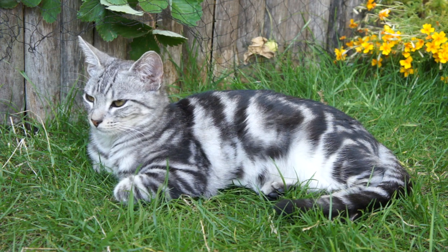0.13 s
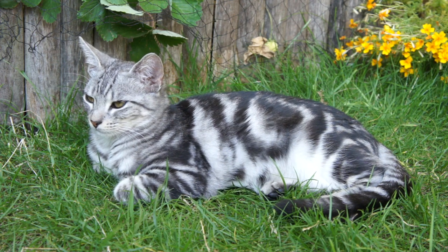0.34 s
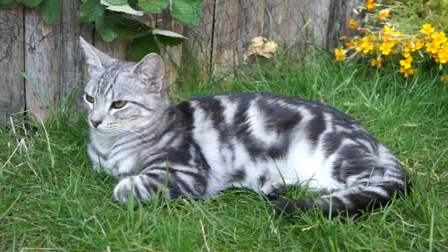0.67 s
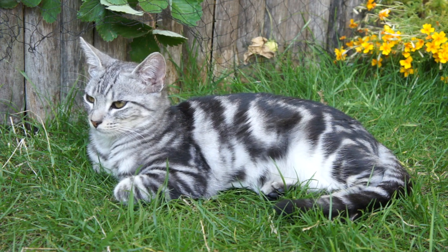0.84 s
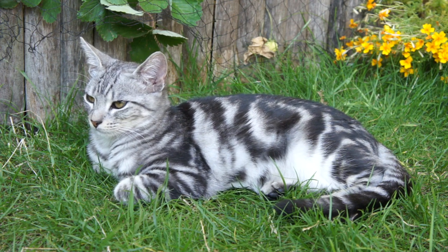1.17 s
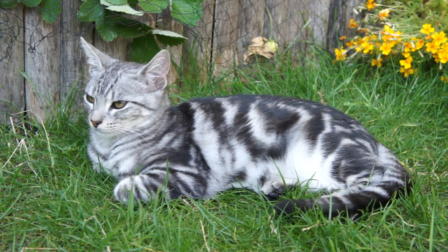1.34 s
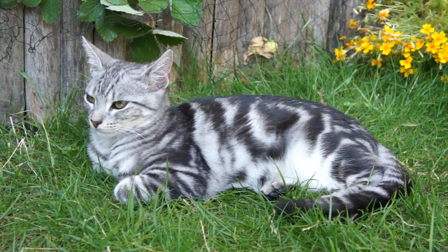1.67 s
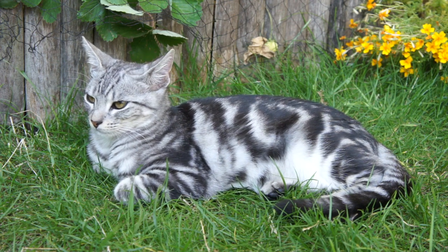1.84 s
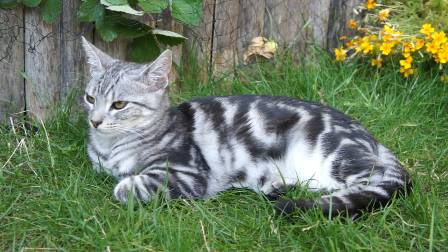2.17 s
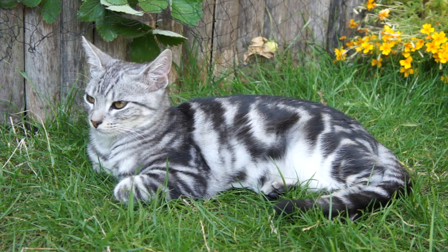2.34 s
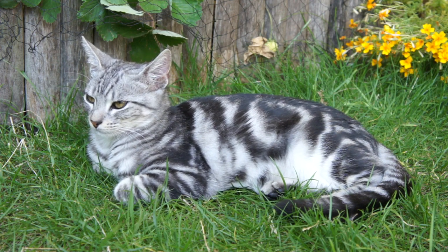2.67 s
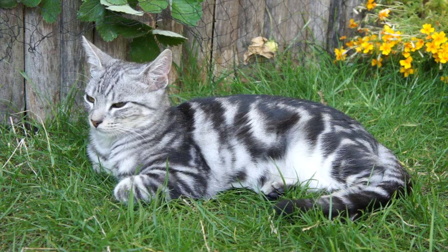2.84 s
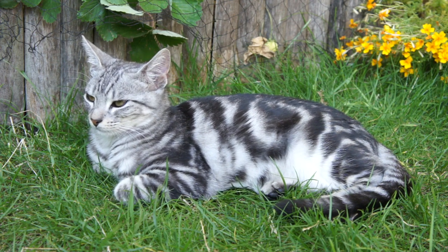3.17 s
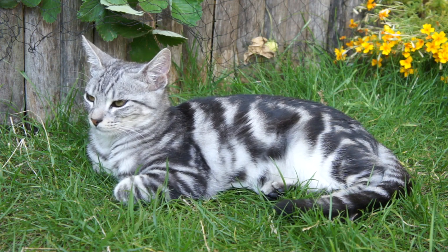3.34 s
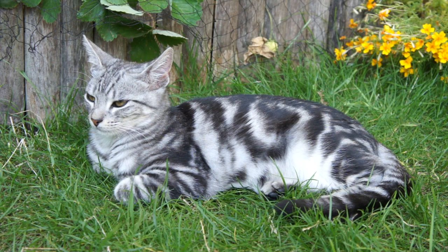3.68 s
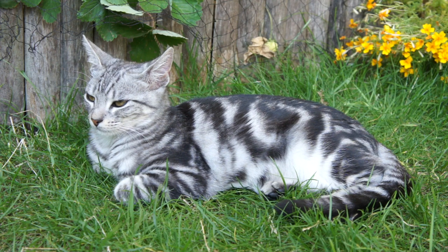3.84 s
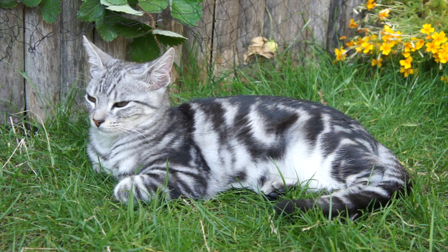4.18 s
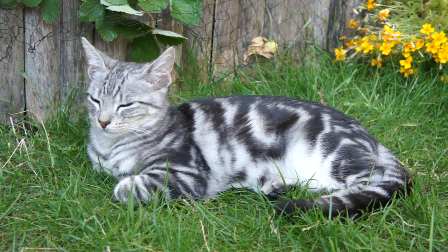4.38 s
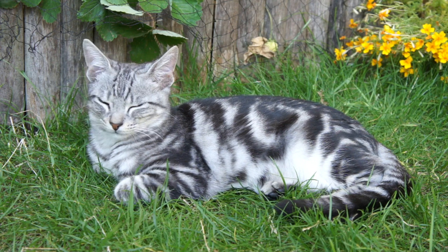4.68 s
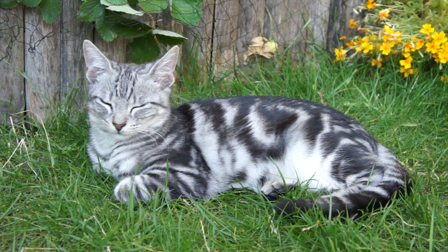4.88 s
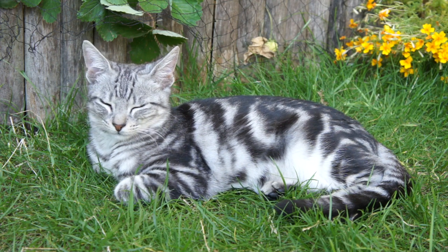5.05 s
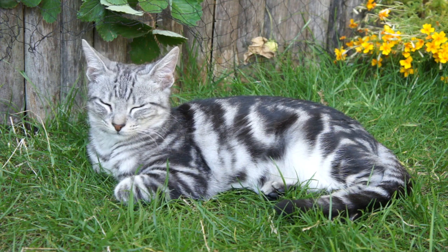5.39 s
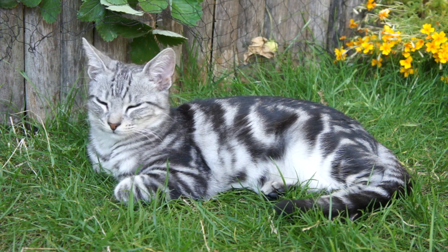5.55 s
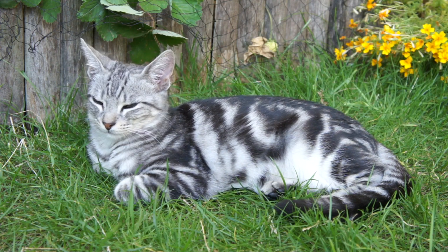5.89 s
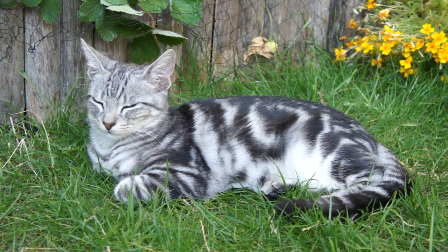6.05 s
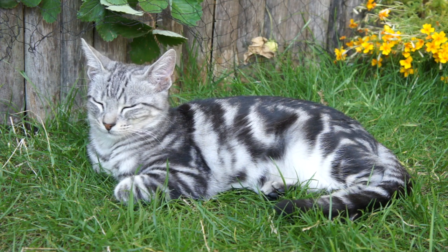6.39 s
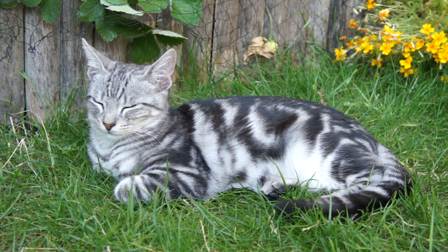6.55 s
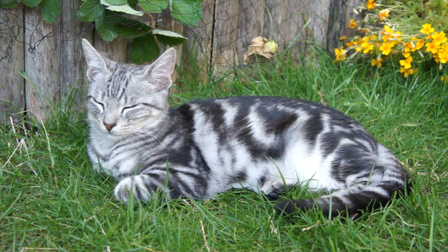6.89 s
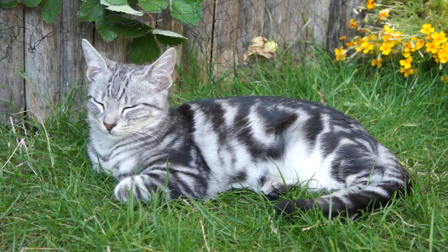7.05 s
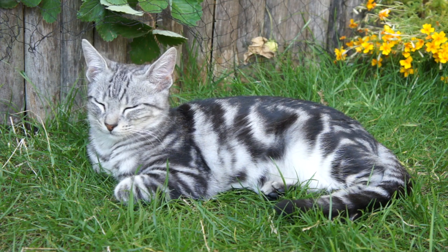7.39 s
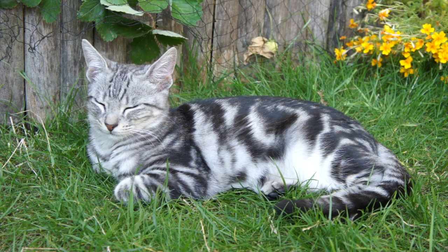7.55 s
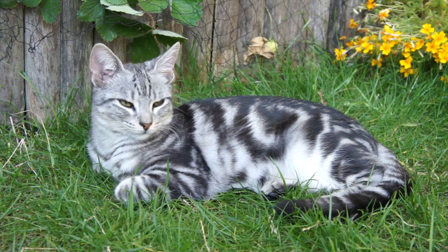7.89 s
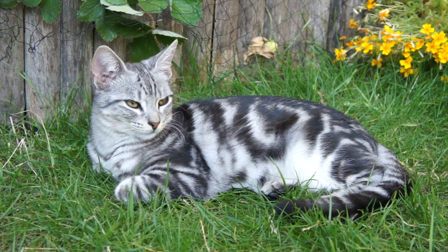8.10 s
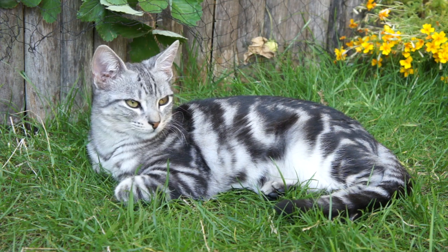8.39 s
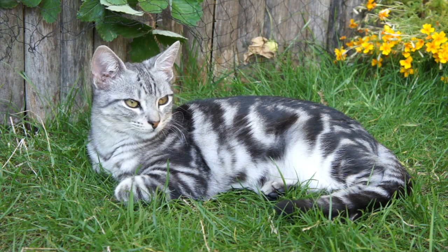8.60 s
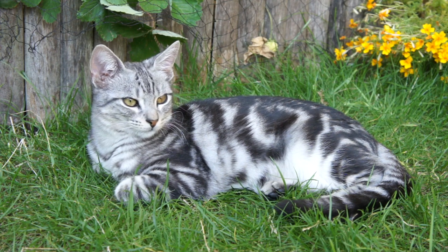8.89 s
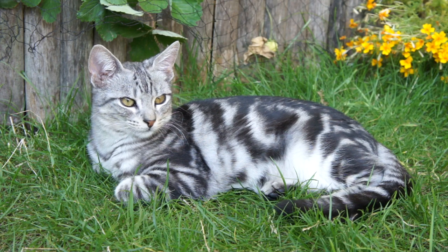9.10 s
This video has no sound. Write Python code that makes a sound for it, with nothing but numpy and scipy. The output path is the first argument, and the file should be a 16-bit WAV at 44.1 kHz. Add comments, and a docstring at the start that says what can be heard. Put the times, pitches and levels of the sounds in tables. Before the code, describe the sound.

Songbirds sing in a garden with a slight echo, over a very soft, distant rush of leaves and traffic. A nearby warbler opens with two high whistles, each followed by a tumbling note. From 1 to 2 seconds it repeats a quick sweeping, ticking phrase three times, then gives three rattling buzzes until about 3.2 seconds. Farther birds whistle and a flock chatters from roughly 2 to 4 seconds. The song thins to a lull around 5 seconds, where the rush dips and grass snaps faintly twice. At 6 seconds a second close bird gives a rising trill and a few falling notes, then a lower three-note phrase at about 7, 7.8 and 8.5 seconds, with distant whistles between. Soft, low gusts thump the microphone just after 7 seconds and again between 8 and 9. A faint row of pips closes the scene around 9 seconds.

```python
"""Songbirds in a garden, their gliding tones echoing off fences and trees over a soft distant rush.
A near warbler opens with whistles and tumbling notes, then rattles through sweeps, ticks and buzzes
while far birds whistle and a flock chatters. Midway the rush sinks and the grass snaps. A second near
bird trills and repeats a three-note phrase as gusts thump the microphone; faint pips close the scene."""
import sys
import numpy as np
from scipy import signal
from scipy.fft import rfft, irfft, next_fast_len
from scipy.io import wavfile
from scipy.ndimage import uniform_filter1d, map_coordinates

SR = 44100
rng = np.random.default_rng(int(sys.argv[2]) if len(sys.argv) > 2 else 0)


def pcm_store(signal):
    """Save signal as 16-bit PCM."""
    levels = np.round(np.clip(np.atleast_2d(signal), -1, 1) * 32767)
    wavfile.write(sys.argv[1], SR, levels.astype(np.int16).T)


N = 407043
TIME = np.arange(N) / SR


def amp(db):
    """Decibels to gain."""
    return 10 ** (np.asarray(db) / 20)


def unit(x):
    """Scale to rms 1."""
    return x / np.sqrt(np.mean(x ** 2) + 1e-20)


def along(points, hz):
    """Read a curve of (f/Hz, value) points on a log frequency axis."""
    f, value = np.transpose(points)
    return np.interp(np.log(hz + 1), np.log(f + 1), value)


def wobble(rate):
    """A smooth random modulator, rate knots a second."""
    return map_coordinates(rng.standard_normal(int(N * rate / SR) + 4), [TIME * rate])


def filtered(x, response):
    """EQ x with a gain curve over frequency."""
    size = next_fast_len(N + 8192)
    return irfft(rfft(x, size) * response(np.fft.rfftfreq(size, 1 / SR)), size)[..., :N]


def stereo_noise(spectrum, correlation):
    """Coloured mid/side noise of rms 1; low correlation makes it wide."""
    def response(hz):
        width = np.arccos(np.clip(along(correlation, hz), -1, 1)) / 2
        return amp(along(spectrum, hz)) * [np.cos(width), np.sin(width)]
    mid, side = filtered(rng.standard_normal((2, N)), response)
    return unit(np.array([mid + side, mid - side]))


# Colour of the bed: f/Hz, relative level/dB
RUSH_EQ = [(30, -46.5), (190, -16), (350, -9), (750, -12.5), (1100, -15), (3330, -17.5), (6770, -28.5),
           (8800, -39), (11300, -53), (12000, -75.5)]
# Its stereo image: f/Hz, left-right correlation
RUSH_IMAGE = [(100, 1), (300, 0.79), (3000, 1), (8000, 0.92)]
# Its fader rides: t/s, rustle level/dB, hiss level/dB
RUSH_FADERS = [(0, -67.5, -70.5), (3.701, -67, -67.5), (4.6, -70.5, -71.5), (5.069, -76.5, -79.5),
               (5.1, -64, -77.5), (5.219, -71, -75), (5.349, -64.5, -74.5), (5.7, -69.5, -75),
               (5.781, -62, -68.5), (9.23, -62.5, -68.5)]

def distant_rush():
    """A bed of leaves and traffic: an uneven low rustle and a high hiss that swell separately."""
    s, rustle_db, hiss_db = np.transpose(RUSH_FADERS)
    noise = stereo_noise(RUSH_EQ, RUSH_IMAGE)
    low = filtered(noise, lambda hz: 1 / (1 + (hz / 1200) ** 4))
    rustle = amp(np.interp(TIME, s, rustle_db) + 0.98 * wobble(14)) * low
    return rustle + amp(np.interp(TIME, s, hiss_db)) * (noise - low)


# Overtones passed by throat resonances: harmonic, relative level/dB, centre f/Hz, width/Hz, onset t/s
OVERTONES = [(2, -37, 7900, 900, .012), (4, -51, 10550, 430, .05)]

def sing(notes, edge_s, hoarse, rasp_hz, bright_db=np.zeros(N), smooth_samples=151):
    """A bird's throat: gliding sines through (t/s, f/Hz, level/dB) points, smeared by hoarse breath."""
    out = np.zeros(N)
    rasp = wobble(rasp_hz) + 1j * wobble(rasp_hz)
    uneven_db = 0.5 * wobble(70)
    overtone_blur = 1 + 1.1 * rasp
    roughness = np.sqrt(1 - hoarse) + np.sqrt(hoarse / 2) * rasp
    for note in notes:
        s, *columns = np.array(sorted(note)).T
        at = np.arange(max(int((s[0] - edge_s) * SR), 0), min(int((s[-1] + edge_s) * SR), N))
        t = at / SR
        hz, *curves = (np.interp(t, s, column) for column in columns)
        hz = uniform_filter1d(hz, smooth_samples, mode="nearest")  # muscles round a glide's corners
        if len(curves) == 1:
            db, = curves
        else:  # a throbbing note: slant makes each throb climb slowly, swelling, and drop back fast
            top_hz, db, depth_db, slant, rate = curves
            turn = 2 * np.pi * np.cumsum(rate) / SR
            lift = (1 + np.cos(turn + 0.78 * slant * (1 - np.cos(turn)))) / 2
            hz = hz + (top_hz - hz) * lift
            db = db + uneven_db[at] + depth_db * (np.cos(turn + 2 * np.pi * 0.32 * slant) - 0.5)
        fade = np.clip(np.minimum(t - s[0], s[-1] - t) / edge_s + 1, 0, 1) ** 2
        fundamental = np.exp(2j * np.pi * np.cumsum(hz) / SR)
        tone = fundamental.copy()
        for k, level, centre, width, onset in OVERTONES:
            resonance = amp(level + bright_db[at]) * np.exp(-((k * hz - centre) / width) ** 2)
            tone += overtone_blur[at] * resonance * fundamental ** k * (t > s[0] + onset - edge_s)
        out[at] += np.sqrt(2) * amp(db) * fade * np.real(tone * roughness[at])
    return out


# The near birds' syllable shapes, by name: t/s from the cue, f/Hz, relative level/dB
SYLLABLE_SHAPES = { "whistle": [(.003, 3670, -15), (.025, 3855, -11.5), (.031, 3900, -2), (.047, 4074, 1.5),
                   (.056, 3977, -3.5)], "step": [(0, 4210, -19), (.015, 3973, -1.5), (.03, 4030, -1.5),
                   (.05, 4600, 0), (.095, 4370, -5.5)], "sweep": [(0, 4620, -13), (.004, 5690, -7),
                   (.022, 6000, -6.5), (.042, 5540, -8.5), (.06, 5363, 1), (.08, 4750, -2), (.1, 4580, -8)],
                   "hook": [(0, 3746, -5), (.004, 4694, -4), (.03, 4560, -4)], "pipe": [(0, 3870, -2),
                   (.016, 4150, -1.5), (.046, 4250, -6.5)], "buzz": [(0, 4330, -5.5), (.015, 5790, -4),
                   (.028, 5325, 1), (.04, 5202, -8)], "fall": [(0, 5560, -4), (.019, 4440, 3.5),
                   (.044, 3530, 4), (.05, 3397, -18)], "climb": [(0, 3420, -13), (.06, 3910, 0),
                   (.095, 3970, 0.3)], "dip": [(0, 6500, -12), (.007, 4420, -1.5), (.017, 3755, -4.5),
                   (.035, 4190, -1), (.075, 4013, -0.5)], "stairs": [(0, 6560, -13), (.015, 5054, 1),
                   (.045, 4980, -1), (.06, 3800, -6), (.09, 3486, -15)], "warble": [(0, 4120, -27),
                   (.012, 4330, -5), (.035, 2650, -2.5), (.06, 3780, 0.5), (.08, 3080, 1),
                   (.105, 3484, -0.5), (.125, 2910, -8)], "leap": [(0, 1712, -27), (.012, 2512, -1),
                   (.028, 3035, 0.5), (.042, 3240, -16)], "drop": [(0, 3523, -8.5), (.015, 2684, 1.5),
                   (.035, 2403, -2), (.047, 2144, -10.5), (.053, 1620, -31)], "slide": [(0, 3166, -6),
                   (.015, 2504, 1.7), (.05, 2227, 1), (.11, 1952, -9), (.165, 1782, -8.5)],
                   "chip": [(0, 3725, -22), (.006, 2990, -4), (.015, 2554, -5.5), (.03, 2790, -1),
                   (.045, 2924, -3)], "chirp": [(-.003, 4700, -45.5), (.004, 3340, -6.5), (.014, 2625, -2),
                   (.026, 2598, -6), (.038, 2798, -0.5), (.049, 2882, -6)], "slur": [(.003, 2270, -5.5),
                   (.025, 2023, -6), (.042, 1918, -10.5), (.053, 2125, 0.5), (.063, 2540, 0.5),
                   (.075, 2678, 2.5), (.11, 2510, 2.1), (.17, 2465, -1.5), (.18, 2220, -11)], }
# Their cues, by name: t/s, pitch ratio, length ratio, level/dB
SYLLABLE_CUES = { "whistle": [(-.042, 0.96, 0.85, -29), (.435, 0.98, 0.86, -29)],
                 "step": [(.875, 1, 0.98, -32)], "sweep": [(1.057, 0.97, 0.86, -33), (1.425, 1, 1, -33.5),
                 (1.787, 1.006, 1.02, -34.5)], "hook": [(1.209, 1.07, 0.59, -41),
                 (1.577, 1.07, 0.74, -37.5), (1.932, 1.01, 1.2, -39)], "pipe": [(1.221, 1.008, 0.94, -36.5),
                 (1.589, 0.99, 0.9, -37), (1.944, 1.005, 1.01, -39)], "buzz": [(2.205, 0.99, 0.99, -39),
                 (2.64, 0.99, 0.84, -36), (3.085, 0.988, 0.89, -37)], "fall": [(2.297, 0.99, 0.95, -40.5),
                 (2.72, 1.037, 0.82, -41)], "climb": [(2.44, 1.01, 1.1, -47), (2.865, .99, 0.95, -46.5)],
                 "dip": [(4.035, 1, 1, -50.5)], "stairs": [(4.39, 1, 1, -48.5)],
                 "warble": [(5.725, 1, 0.99, -44)], "leap": [(6.42, 1.07, 1.02, -35.5),
                 (6.6, .93, 1.1, -34.5)], "drop": [(6.475, 0.99, 1, -33.5)],
                 "slide": [(6.65, 1, 0.99, -38)], "chip": [(7.048, 1.008, 1.016, -32),
                 (7.778, 0.99, .98, -33.5), (8.548, .995, 1, -33.5)], "chirp": [(7.142, 1, 1.1, -30.5),
                 (7.872, 0.97, 1.1, -33), (8.64, 1, 1.1, -31.5)], "slur": [(7.305, 1.004, 0.96, -36.5),
                 (8.03, 0.99, 1.02, -38), (8.805, 1, 1.0457, -39)], }

def syllables():
    """Each syllable keeps its shape, transposed and stretched for every cue."""
    return [[(s + stretch * after, ratio * hz, db + trim) for after, hz, trim in SYLLABLE_SHAPES[name]]
            for name, cues in SYLLABLE_CUES.items() for s, ratio, stretch, db in cues]


# Reverb time of the garden: f/Hz, t60/s
GARDEN_DECAY = [(1600, 0.45), (2400, 0.22), (4500, 0.18), (7000, 0.069)]

def garden_echo(send, predelay_s=0.0064, width=0.4, flutter_db=1.1):
    """Fences and foliage scatter the song; the pattern shifts and flutters as birds and leaves move."""
    out, hop = np.zeros((2, N + 2 * SR)), SR // 5
    send = np.pad(send, (hop, 0))
    for start in range(0, len(send), hop):  # a fresh tail for each overlapping grain
        hz, t, noise = signal.stft(rng.standard_normal((2, SR // 2)), SR, nperseg=256)
        age = t / along(GARDEN_DECAY, hz)[:, None]
        decay = amp(-60 * age ** 0.93) + amp(-25 - 22 * age)  # main tail and a faint late haze
        mid, side = signal.istft(noise * decay, SR, nperseg=256)[1]
        tail = np.array([mid + width * side, mid - width * side]) / np.linalg.norm(mid)
        grain = send[start:start + 2 * hop]
        grain = grain * np.hanning(2 * hop)[:len(grain)]
        echo = signal.fftconvolve(grain[None], tail, axes=1)
        first = start + int(predelay_s * SR)
        out[:, first:first + echo.shape[1]] += echo
    return out[:, hop:hop + N] * amp(flutter_db * wobble(120))


# A tumble: t/s from the cue, low f/Hz, high f/Hz, relative level/dB, throb depth/dB, slant 0-1
TUMBLE_SHAPE = [(0, 4780, 5633, -9.5, 13, 1), (0.035, 4708, 5150, 2, 5.5, 1),
                (0.05, 3650, 4310, -7, 0, 0.98), (0.071, 2810, 3080, -11.5, 3, 0.5)]
# Its cues: t/s, pitch ratio, level/dB, throb rate/Hz
TUMBLE_CUES = [(0.1276, 0.96, -32.5, 130), (0.567, 0.96, -33.5, 106)]

def tumbles():
    """The warbler's note throbs rapidly as it tumbles down in pitch."""
    return [[(s + after, ratio * low, ratio * high, db + trim, depth, slant, rate)
             for after, low, high, trim, depth, slant in TUMBLE_SHAPE]
            for s, ratio, db, rate in TUMBLE_CUES]


# Single ticks: centre t/s, level/dB
TICK_CUES = [(1.28, -38.5), (1.647, -40), (2.002, -47.5)]
# A four-tick rattle: t/s from the cue, start f/Hz, end f/Hz, relative level/dB
RATTLE_SHAPE = [(0, 6450, 4266, -2), (.015, 6740, 4990, -2.2), (.026, 6200, 5000, -3),
                (.039, 5910, 4504, 1.5)]
# Its cues: t/s, level/dB
RATTLE_CUES = [(2.152, -38), (2.587, -37), (3.031, -37.5)]

def ticks(fall_hz_per_s=260000):
    """Downward sweeps so steep that they click, loudest in the middle."""
    sweeps = [(s, 6510, 4730, db) for s, db in TICK_CUES]
    sweeps += [(s + after, top, end, db + trim)
               for s, db in RATTLE_CUES for after, top, end, trim in RATTLE_SHAPE]
    notes = []
    for s, top, end, db in sweeps:
        half_s = (top - end) / fall_hz_per_s / 2
        notes.append([(s - half_s, top, db - 13), (s, (top + end) / 2, db), (s + half_s, end, db - 5.5)])
    return notes


def glides(rows, swell_db_per_s, fade_db_per_s):
    """A glide swells to its peak, bends there and fades."""
    return [[(start, start_hz, db - swell_db_per_s * (peak - start)),
             (peak, peak_hz, db),
             (end, end_hz, db - fade_db_per_s * (end - peak))]
            for start, peak, end, start_hz, peak_hz, end_hz, db in rows]


# Background calls: start t/s, peak t/s, end t/s, start f/Hz, peak f/Hz, end f/Hz, level/dB
FAR_GLIDES = [ (1.59, 1.62, 1.628, 1540, 1700, 1760, -68.5), (1.77, 1.82, 1.826, 1560, 1750, 1785, -70.5),
              (1.885, 1.92, 1.95, 2600, 2960, 2964, -52.5), (1.95, 1.98, 2.02, 2970, 2950, 2760, -54),
              (2.02, 2.04, 2.09, 2874, 3090, 2850, -52), (1.92, 2.04, 2.14, 1920, 2170, 2136, -54),
              (2.91, 2.98, 3.03, 1750, 2330, 2090, -64), (2.2, 2.24, 2.265, 2950, 2640, 2786, -53.5),
              (2.375, 2.45, 2.48, 1345, 1780, 1970, -64.5), (2.62, 2.73, 2.752, 1601, 1900, 2086, -49),
              (2.6, 2.63, 2.707, 3150, 2780, 3262, -52.5), (2.745, 2.76, 2.795, 2620, 2720, 2930, -55),
              (2.83, 2.88, 2.899, 2770, 2700, 2710, -59.5), (2.92, 2.93, 2.954, 2794, 3000, 3300, -47),
              (2.97, 3.02, 3.08, 3074, 3350, 3550, -53.5), (3.08, 3.13, 3.14, 2010, 2260, 2180, -58),
              (3.16, 3.2, 3.28, 2154, 2030, 1905, -54), (3.28, 3.3, 3.42, 1880, 1870, 1845, -56.5),
              (3.125, 3.135, 3.155, 2550, 2900, 3140, -57), (3.22, 3.265, 3.331, 2480, 3250, 3193, -54),
              (3.342, 3.37, 3.42, 2830, 2770, 2658, -47), (3.375, 3.405, 3.445, 3000, 3300, 3250, -59),
              (3.49, 3.53, 3.545, 3195, 2960, 3080, -49), (3.555, 3.585, 3.71, 3050, 3270, 3350, -63.5),
              (3.68, 3.72, 3.721, 1948, 2080, 2250, -58), (3.815, 3.88, 3.937, 1988, 2000, 1970, -57),
              (4.15, 4.17, 4.362, 1987, 2050, 1916, -62.5), (2.165, 2.18, 2.2, 3800, 3200, 2510, -56),
              (3.825, 3.84, 3.88, 2420, 2380, 2320, -65.5), (3.825, 3.86, 3.868, 2900, 2950, 3060, -66),
              (4.02, 4.03, 4.08, 2700, 2650, 2575, -68), (4.39, 4.435, 4.445, 2300, 2700, 2760, -69.5),
              (5.975, 5.985, 6.017, 3712, 3900, 3800, -66.5), (7.12, 7.13, 7.143, 1814, 1845, 1900, -59.5),
              (7.68, 7.72, 7.74, 2150, 1960, 1971, -51.5), (7.73, 7.76, 7.785, 1880, 1850, 1834, -52.5),
              (7.83, 7.94, 7.975, 1250, 1460, 1492, -54.5), (8.16, 8.22, 8.243, 2250, 2000, 1816, -53.5),
              (8.3, 8.36, 8.4, 1640, 1545, 1588, -52.5), (8.47, 8.53, 8.587, 1298, 1255, 1197, -62.5),
              (8.565, 8.6, 8.626, 2002, 2019, 1935, -55.5)]

def far_whistles():
    """Birds farther off whistle lower, gentler glides."""
    return glides(FAR_GLIDES, swell_db_per_s=165.5, fade_db_per_s=123.5)


def flock(count=260, from_s=1.9, to_s=3.9, level_db=-63.5):
    """A distant flock chatters in tiny random glides, more low than high, swelling and dying away."""
    notes = []
    for when, pitch, bend, softness in rng.random((count, 4)):
        s = from_s + when * (to_s - from_s)
        hz = 2200 * 2.3 ** pitch ** 1.8
        db = level_db - 9 * softness + 10 * np.log10(np.sin(np.pi * when))
        notes.append([(s, hz, db), (s + 0.018, hz * (1 + 0.5 * (bend - 0.5)), db)])
    return notes


def buzz_beating(after_s=0.0082, length_s=0.03, beat_hz=1500, depth=0.24):
    """Gain ripple of a second membrane beating against the held top of each buzz."""
    swell = sum(np.sin(np.pi * np.clip((TIME - s - after_s) / length_s, 0, 1))
                for s, *_ in SYLLABLE_CUES["buzz"])
    return 1 + depth * swell * np.cos(2 * np.pi * beat_hz * TIME)


# Foreground fills: start t/s, peak t/s, end t/s, start f/Hz, peak f/Hz, end f/Hz, level/dB
NEAR_GLIDES = [ (2.45, 2.5, 2.502, 4170, 4296, 4782, -48), (2.355, 2.37, 2.39, 3253, 2780, 2460, -47.5),
               (2.8, 2.86, 2.89, 3270, 3003, 3029, -45), (2.91, 2.93, 2.95, 4350, 4480, 4467, -51),
               (3.225, 3.25, 3.275, 3870, 4534, 4700, -47.5), (3.23, 3.25, 3.262, 5240, 6850, 6383, -47.5),
               (3.31, 3.328, 3.33, 5200, 5670, 5527, -49.5), (3.356, 3.358, 3.38, 4672, 4448, 4900, -49.5),
               (3.356, 3.36, 3.385, 6250, 6096, 5840, -49.5), (3.545, 3.548, 3.565, 3700, 4000, 4580, -54),
               (3.548, 3.555, 3.575, 5000, 6124, 5920, -51.5), (3.63, 3.636, 3.65, 5600, 5450, 5394, -57),
               (3.652, 3.661, 3.69, 5600, 6310, 6180, -52.5), (3.67, 3.705, 3.74, 4630, 4271, 3770, -48),
               (3.8, 3.81, 3.818, 3120, 2859, 2750, -52.5), (4.142, 4.145, 4.165, 5112, 5000, 4470, -55.5),
               (4.525, 4.528, 4.55, 4260, 4302, 4030, -58.5), (5.718, 5.735, 5.8, 5630, 6065, 6250, -56),
               (6.413, 6.416, 6.419, 3110, 2873, 2847, -58.5),
               (2.465, 2.51, 2.524, 5050, 5300, 5400, -53.5), (2.87, 2.93, 2.965, 5470, 5960, 6340, -54)]

def twitter():
    """Quick, high glides around the near birds' syllables."""
    return glides(NEAR_GLIDES, swell_db_per_s=274.5, fade_db_per_s=418.5)


# Dry snaps and rustles: t/s, pre-filter level/dB, low-cut f/Hz, t60/s
SNAP_CUES = [(5.27, -53.5, 9090, 0.027), (5.442, -50.5, 9000, 0.0172), (6.579, -60.5, 2993, 0.35),
             (8.65, -58.5, 7500, 0.023)]

def grass_snaps():
    """Grass snaps in thin cracks of noise that die quickly, their top end softened."""
    out, t = np.zeros(N), np.arange(SR // 8) / SR
    for s, db, low_hz, t60 in SNAP_CUES:
        crack = amp(db - 60 * t / t60) * rng.standard_normal(len(t))
        low_cut = signal.butter(2, low_hz, "highpass", fs=SR, output="sos")
        out[round(s * SR):][:len(t)] += signal.sosfilt(low_cut, crack)
    return filtered(out, lambda hz: 1 / (1 + (hz / 7000) ** 3))


# Gusts: t/s, length/s, level/dB
GUST_CUES = [(5.816, 0.13, -80), (7.14, .07, -56.5), (8.147, 0.13, -57), (8.309, 0.076, -56.5),
             (8.541, 0.25, -52.5), (8.892, 0.26, -72)]
# Colour of their thump: f/Hz, relative level/dB
GUST_EQ = [(45, -42), (110, -8.5), (165, 4.5), (300, -12), (500, -55), (900, -110)]

def wind():
    """Each gust beats on the microphone in a few bassy lumps."""
    swell = sum(amp(db) * np.sin(np.pi * np.clip((TIME - s) / length, 0, 1))
                for s, length, db in GUST_CUES)
    lumps = amp(4.4 * wobble(22))
    return swell * unit(lumps * stereo_noise(GUST_EQ, correlation=[(100, 0.91)]))


# The trill: t/s, low f/Hz, high f/Hz, level/dB, throb depth/dB, slant 0-1, throb rate/Hz
TRILL_SHAPE = [(5.9762, 1930, 1943, -76, 4, 0, 50), (6.025, 2128, 2170, -52, 2.5, 0.4, 50),
               (6.031, 2146, 2288, -43, 2.5, 0.1, 50), (6.085, 2076, 2672, -42, 9, 0.1, 50),
               (6.155, 2100, 3075, -43, 8, 0.4, 49.5), (6.175, 2370, 3345, -38.5, 6.5, .7, 48.5),
               (6.217, 2663, 3717, -43.5, 5.5, 0.9, 46.5), (6.312, 3083, 3924, -44.5, 6.5, .95, 38)]

def trill():
    """The second bird holds one throbbing note that rises as its pulse slows."""
    return [TRILL_SHAPE]


def pips(count=5, from_s=8.917, gap_s=0.038, hz=2814, db=-57.5):
    """A faint, even row of pips on one pitch."""
    return [[(s, hz, db), (s + 0.0028, hz, db)] for s in from_s + gap_s * np.arange(count)]


# Voice automation: t/s, hoarse share 0-1, echo send level/dB, near birds' overtone level/dB
VOICE_AUTOMATION = [(0, .006, -9, -3), (1.1, .03, -5, -7), (2.5, .3, -5, -8), (3.8, .35, -5, -6),
                    (4.1, .03, -8, -3), (5.6, .015, -10, -12), (6.3, .01, -7, -12), (6.5, .015, -9, -12),
                    (7, .012, -10, 8), (8, .015, -9, 1), (8.9, .015, -9, 7)]
SECOND_BIRD_S = 5.5
BREATH_DB, BREATH_HZ = -41, 7300
WALL_DELAY_S, WALL_DB = 0.22, -38.5

def birds():
    """The bird mix: near voices are mostly direct; far ones are smeared by leaves and sit wetter."""
    s, *lanes = np.transpose(VOICE_AUTOMATION)
    hoarse, send_db, bright_db = (np.interp(TIME, s, lane) for lane in lanes)
    near = sing(syllables() + twitter() + pips(), 0.0067, hoarse,
                rasp_hz=500, bright_db=bright_db, smooth_samples=281) * buzz_beating()
    near += sing(ticks(), 0.005, np.sqrt(hoarse), rasp_hz=1552)
    near += sing(tumbles() + trill(), 0.0005, 2 * hoarse, rasp_hz=904, bright_db=bright_db)
    # air hisses past the warbler's membranes
    hiss = near * rng.standard_normal(N) * (TIME < SECOND_BIRD_S)
    breath = filtered(hiss, lambda hz: np.exp(-(np.log(hz / BREATH_HZ + 1e-9) / 0.26) ** 2))
    near += amp(BREATH_DB) * breath
    far = sing(far_whistles(), 0.01, 0.068 + 0.45 * hoarse, rasp_hz=152.5, smooth_samples=401)
    far += sing(flock(), 0.006, np.full(N, 0.55), rasp_hz=505)
    fade_in = np.clip(TIME / 0.0031, 0, 1)
    send = amp(send_db) * (near + amp(2.5) * far) * fade_in
    # a far wall answers the second bird
    slapback = np.pad(near * (TIME > SECOND_BIRD_S), (int(WALL_DELAY_S * SR), 0))[:N]
    return near + far + garden_echo(send + amp(WALL_DB) * slapback)


def scene():
    """Everything at the microphone."""
    return birds() + distant_rush() + wind() + grass_snaps()


def record(dry):
    """A brick-wall high cut at 12.5 kHz."""
    return filtered(dry, lambda hz: hz < 12500)


dry = scene()
out = record(dry)
pcm_store(out)
```